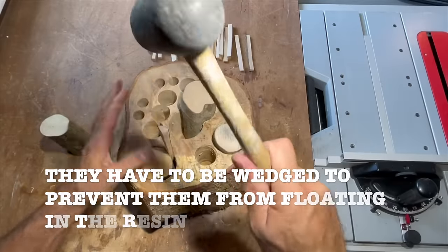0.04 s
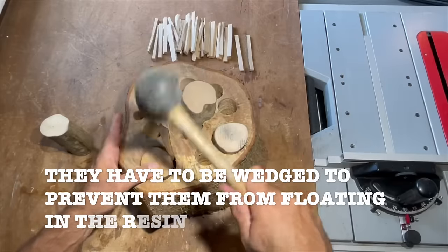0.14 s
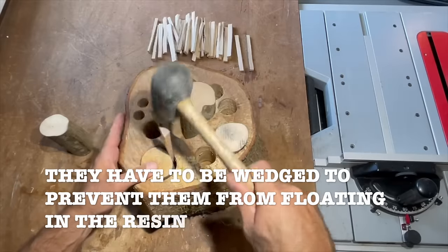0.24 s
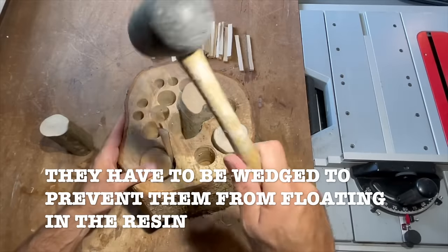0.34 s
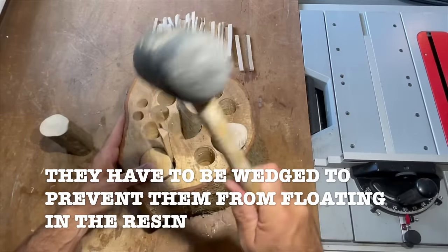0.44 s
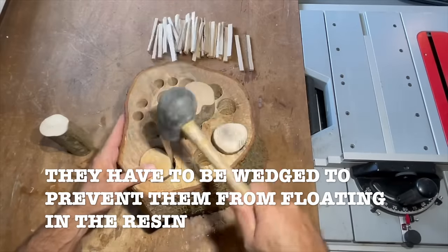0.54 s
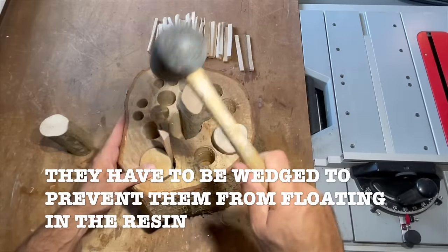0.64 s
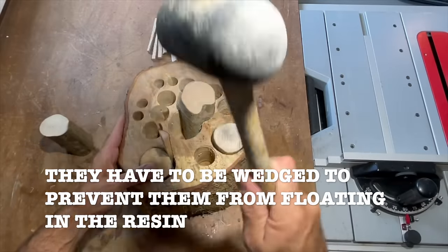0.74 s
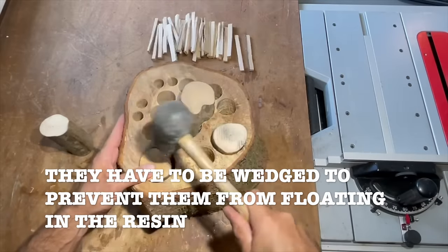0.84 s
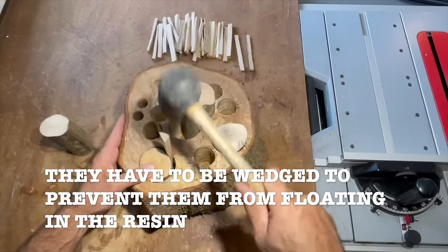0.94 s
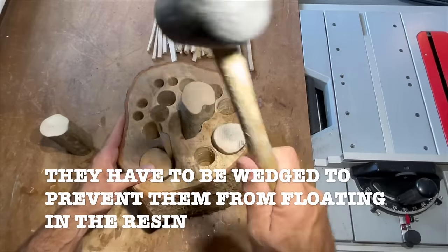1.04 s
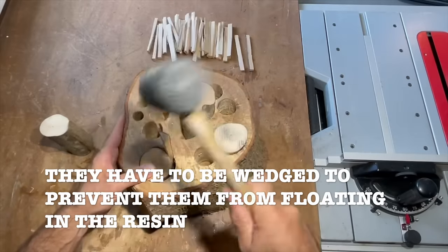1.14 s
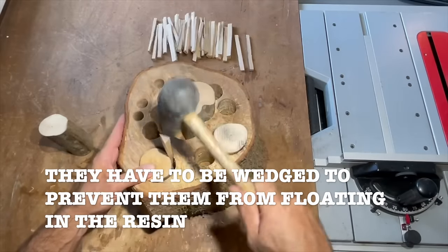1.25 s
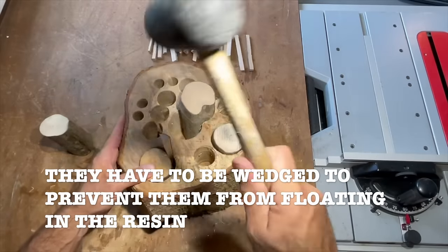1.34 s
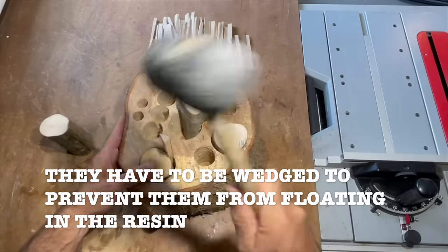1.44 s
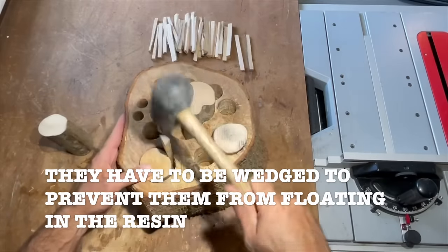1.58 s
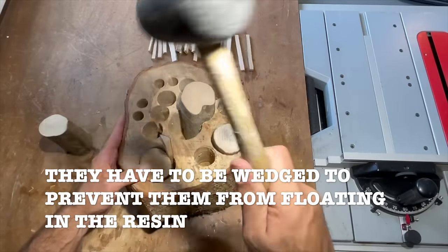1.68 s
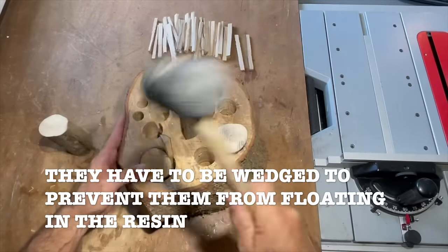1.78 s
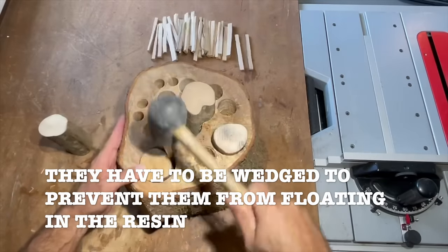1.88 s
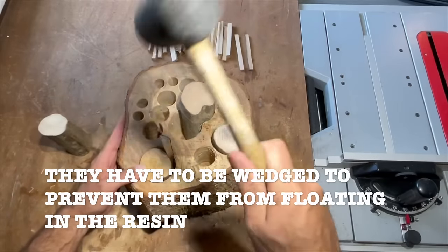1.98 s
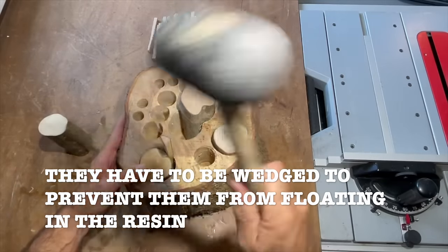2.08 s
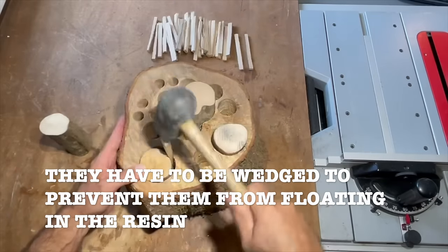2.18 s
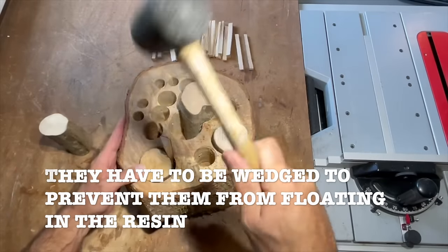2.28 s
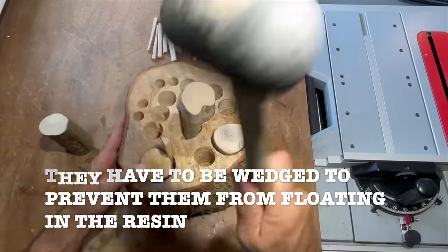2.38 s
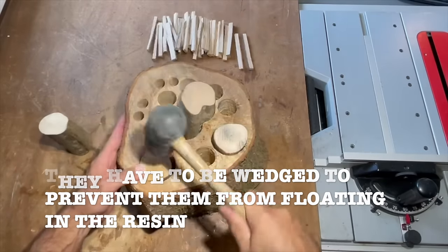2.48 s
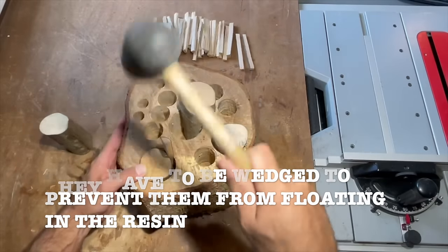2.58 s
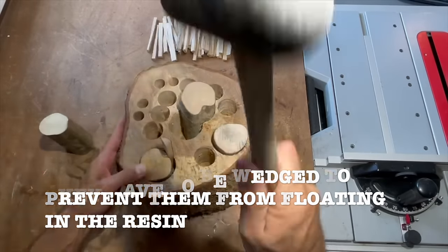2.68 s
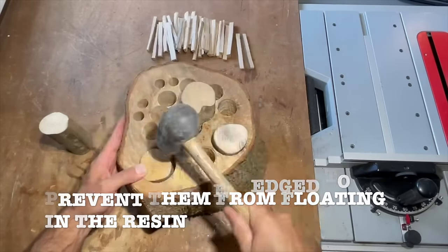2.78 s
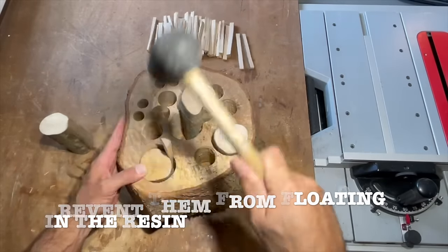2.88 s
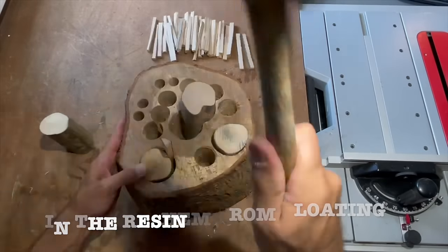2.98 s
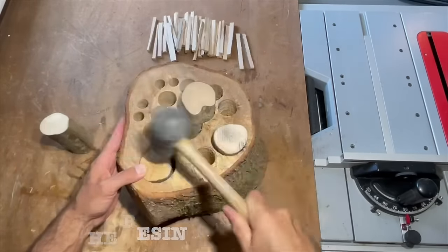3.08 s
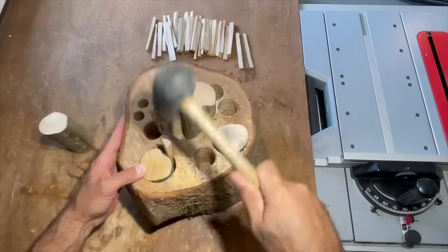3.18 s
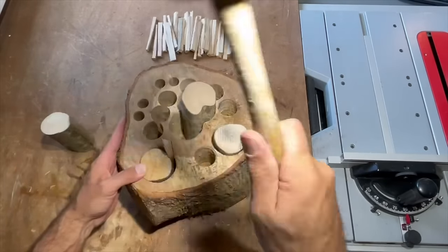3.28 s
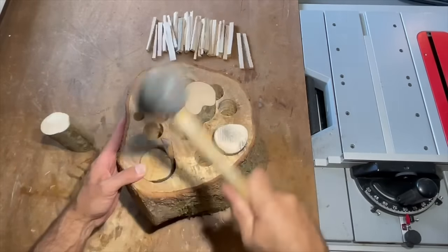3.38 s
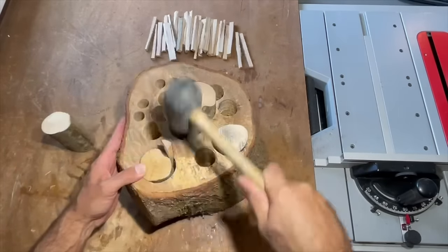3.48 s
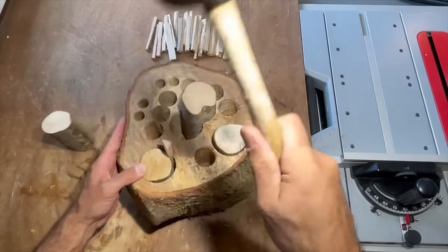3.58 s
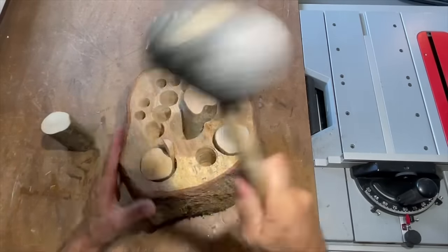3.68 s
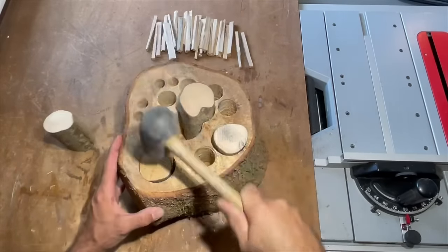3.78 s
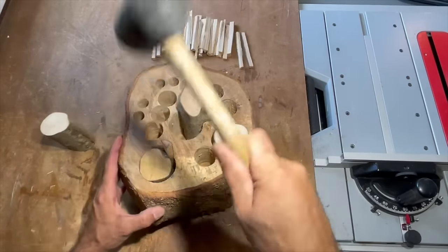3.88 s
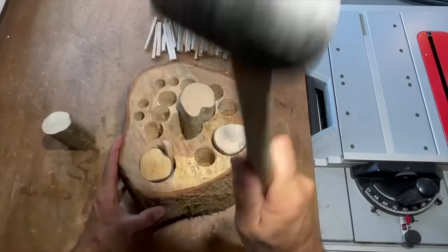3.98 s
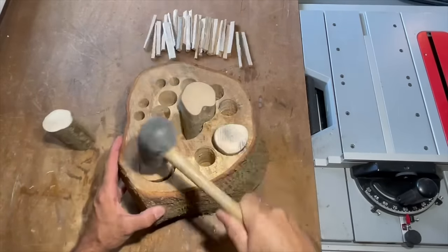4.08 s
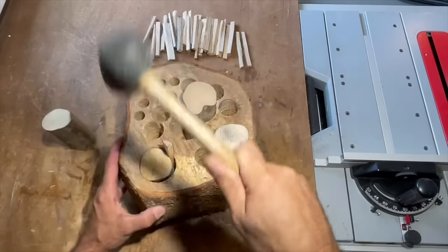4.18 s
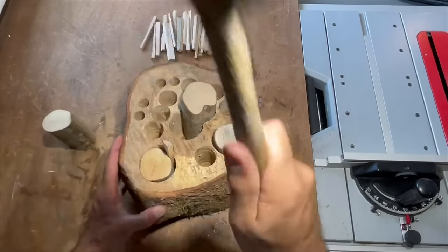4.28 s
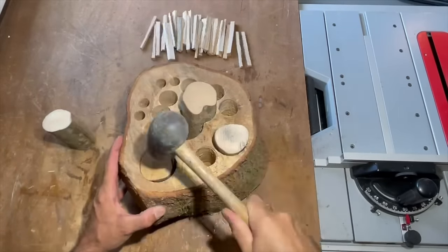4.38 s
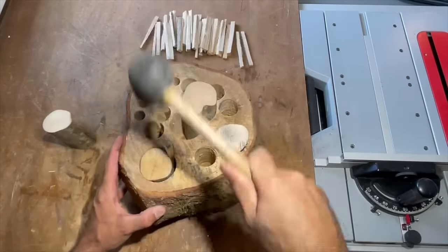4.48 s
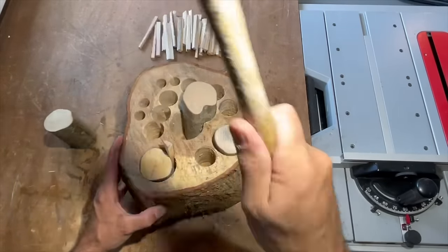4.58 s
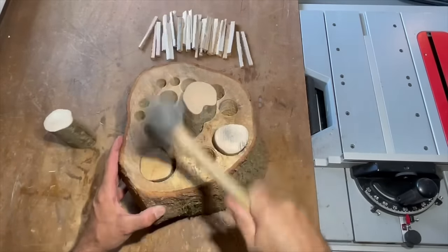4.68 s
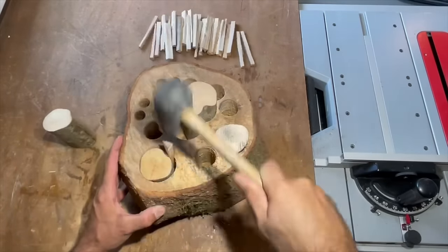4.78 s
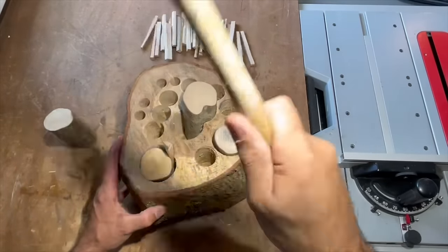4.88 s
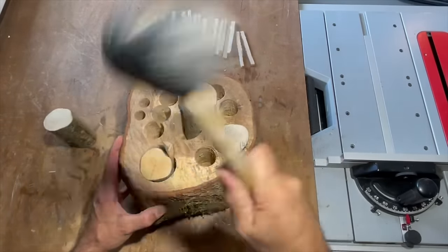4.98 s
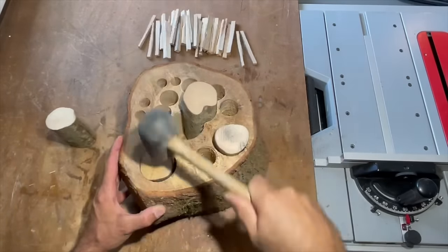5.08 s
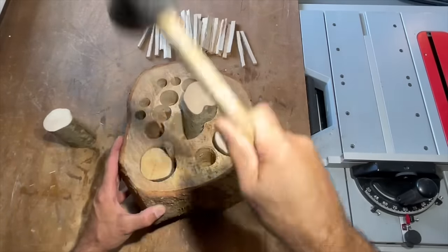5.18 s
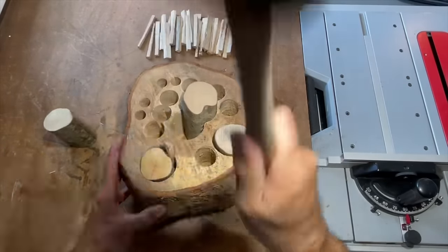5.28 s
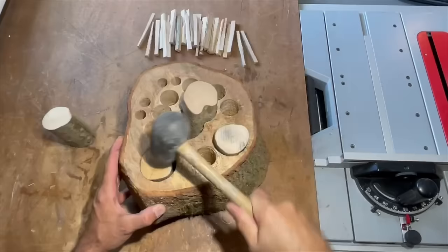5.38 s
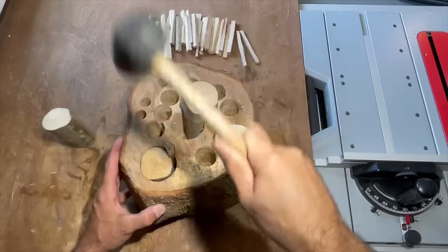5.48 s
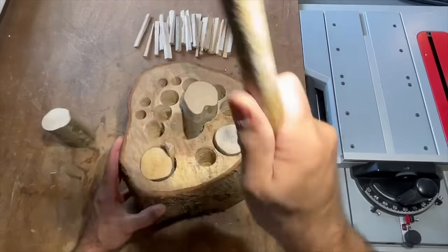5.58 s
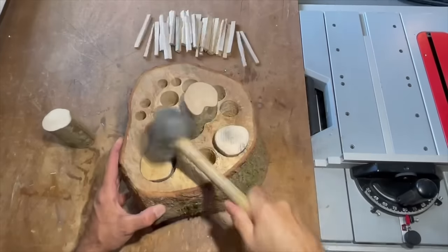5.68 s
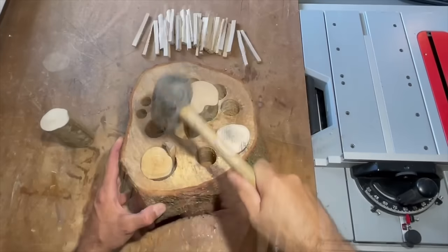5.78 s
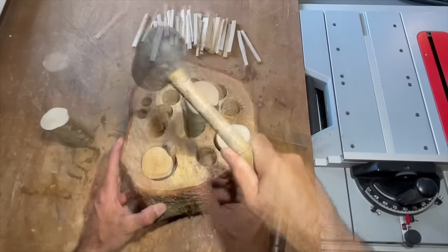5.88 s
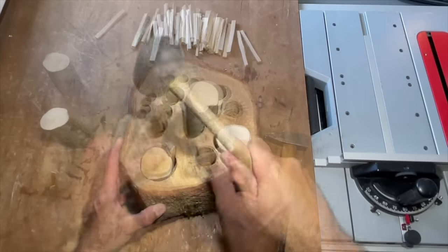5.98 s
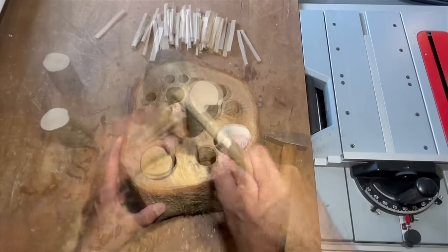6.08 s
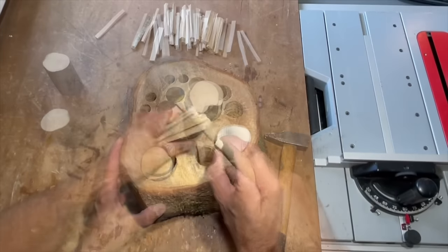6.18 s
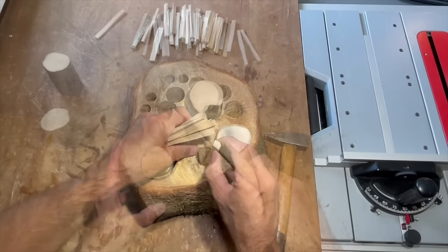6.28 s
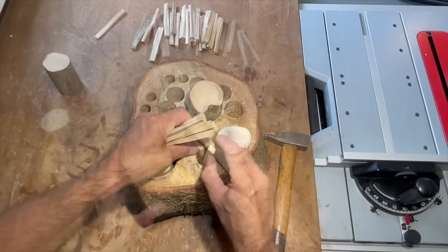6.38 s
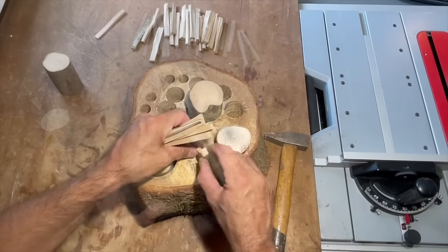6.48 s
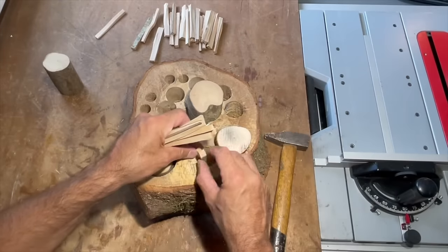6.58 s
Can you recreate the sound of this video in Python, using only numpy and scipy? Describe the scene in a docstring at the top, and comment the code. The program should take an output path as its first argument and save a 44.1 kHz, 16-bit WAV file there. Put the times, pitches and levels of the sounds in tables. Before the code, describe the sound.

Steady mallet knocks on a wooden wedge shift from loose, bright clacks to firm, ringing thuds, then stop, leaving quiet rustling of sticks.

```python
"""A rubber mallet drives a thin wooden wedge into a log slab on a workbench, eighteen even blows in a small workshop.
Wedge, slab, bench and room standing waves are sums of damped modes; noise bursts give the crack of slipping fibres.
As the loose wedge seats, its bright clack gives way to a firmer ring and the slab knocks harder.
A light wooden tick comes just before the last blow and a fainter one after it; then a whir and the handling of sticks.
A low rumble opens as the dying tail of an earlier blow; coloured noise makes the room tail; two ports feed a limiter."""
import sys
import numpy as np
from scipy import signal
from scipy.fft import rfft, irfft, next_fast_len
from scipy.io import wavfile
from scipy.ndimage import uniform_filter1d, minimum_filter1d

SR = 44100
rng = np.random.default_rng(int(sys.argv[2]) if len(sys.argv) > 2 else 0)


def digitize_waveform(pressure):
    """Quantize a signal to 16-bit integers and store it at the path in sys.argv[1].

    Rows of a 2-D input are taken as channels; values are limited to [-1, 1].
    """
    field = np.atleast_2d(pressure).T
    bounded = np.clip(field, -1, 1)
    quanta = np.round(bounded * 32767).astype(np.int16)
    wavfile.write(sys.argv[1], SR, quanta)


N = 293265
T = np.arange(int(SR * 0.8)) / SR  # time within one short sound, in seconds


def amp(db):
    """Level: decibels converted to a linear gain."""
    return 10 ** (np.asarray(db) / 20)


def unit(x):
    """Normalisation: a signal scaled to rms 1."""
    return x / np.sqrt(np.mean(x ** 2) + 1e-20)


def along(points, hz):
    """Logarithmic frequency scale: (Hz, value) points interpolated on a log axis."""
    f, v = np.transpose(points)
    return np.interp(np.log(hz + 1), np.log(f + 1), v)


def shared_difference(points, hz):
    """Stereo difference: left minus right, half given to the left and half taken from the right."""
    half = along(points, hz) / 2
    return np.stack([half, -half])


def filtered(x, response):
    """Linear filtering: the spectrum of x multiplied by a frequency response."""
    n = x.shape[-1]
    m = next_fast_len(n + SR // 4)
    spectrum = rfft(x, m) * response(np.fft.rfftfreq(m, 1 / SR))
    return irfft(spectrum, m)[..., :n]


def decay(age, t60):
    """Exponential damping: a fall of 60 dB in t60 seconds."""
    return np.exp(-np.log(1000) * age / t60)


def onset(s, middle, spread):
    """Logistic transition: a smooth step from 0 to 1 around the time middle."""
    return 0.5 + 0.5 * np.tanh((s - middle) / (2 * spread))


# Incoherence of the two ports. Each row: frequency in Hz, share of noise power not in common.
APART = [(100, 0.055), (400, 0.047), (1000, 0.91), (4000, 0.98), (8000, 0.17), (12000, 0.023)]


def noise(spectrum, size=len(T)):
    """Partial coherence: coloured noise of rms 1, partly common to the two ports and partly their own."""
    white = rng.standard_normal((3, size))
    apart = lambda hz: np.clip(along(APART, hz), 0, 1)
    common = filtered(white[0], lambda hz: amp(along(spectrum, hz)) * np.sqrt(1 - apart(hz)))
    own = filtered(white[1:], lambda hz: amp(along(spectrum, hz)) * np.sqrt(apart(hz)))
    return unit(common + own)


def add(track, s, sound):
    """Superposition: a sound mixed into the track at time s."""
    part = track[:, max(round(s * SR), 0):][:, :sound.shape[-1]]
    part += sound[..., :part.shape[1]]


def alternating(modes):
    """Modal phase: neighbouring modes swing in opposite directions."""
    return np.pi * np.arange(len(modes))[:, None]


def ring(modes, scatter_db, detune, phases=0, pitch=1):
    """Modal superposition: damped modes that swell and die, with random level and pitch at each call."""
    hz, db, t60, rise = np.transpose(modes)[:, :, None]
    louder, sharper = rng.standard_normal((2, len(modes), 1))
    envelope = amp(db + scatter_db * louder) * decay(T, t60) * (1 - np.exp(-T / rise))
    mode_hz = hz * pitch * (1 + detune * sharper)
    return np.sum(envelope * np.sin(2 * np.pi * mode_hz * T + phases), axis=-2)


def burst(hold, t60):
    """Contact friction: full level for hold seconds while the wood slips, then exponential damping."""
    return decay(np.maximum(T - hold, 0), t60)


# Colour of the low rumble. Each row: frequency in Hz, relative level in dB.
RUMBLE_COLOUR = [(25, -20.5), (60, 1.5), (95, 3), (200, -18), (400, -13.5), (700, -20.5), (1100, -29),
                 (3000, -32), (6000, -39.5), (12000, -46.5), (16000, -50)]
# Swells of the rumble: the dying tail of an earlier blow at the start, and a later swell near 6.5 s.
# Each row: centre in seconds, level in dB, half length (to 1/e) in seconds.
RUMBLE_SWELLS = [(0, -49, 0.064), (6.511, -55.5, 0.045)]
HOLD_DB, REST_DB = -56, -67  # rumble while the hands hold the slab, and once they let go
LET_GO_S, LET_GO_SPREAD_S = 5.7, 0.03


def low_rumble():
    """Low-frequency noise: an earlier blow's dying tail, hands holding the slab, and a swell near 6.5 s."""
    t = np.arange(N) / SR
    hold = amp(HOLD_DB + (REST_DB - HOLD_DB) * onset(t, LET_GO_S, LET_GO_SPREAD_S))
    swells = sum(amp(db) * np.exp(-((t - s) / half) ** 2) for s, db, half in RUMBLE_SWELLS)
    return (hold + swells) * noise(RUMBLE_COLOUR, size=N)


# Extra glare of a loose wedge, scaled by 1.5 minus the seating. Each row: frequency in Hz, gain in dB.
LOOSE_GLARE = [(130, 0.5), (250, -2), (420, 1.5), (1000, -1), (1800, 3.5), (3200, 1.5), (5000, -1),
               (8000, 0.5), (12000, 3.5)]
# the free end of the wedge rings higher as it gets shorter
LONG_END_HZ, SHORT_END_HZ = 1740, 2930
SHORTEN_S, SHORTEN_SPREAD_S = 2.2, 0.25  # middle and spread of that rise
LONG_END_DB, END_DB_PER_S = 4.5, 1.5  # it rings freely while loose, and ever harder as it is driven tight


def wedge_colour(s, seat, octaves):
    """Broad resonance: gain over frequency from the shortening free end, with the glare of a loose fit."""
    short = onset(s, SHORTEN_S, SHORTEN_SPREAD_S)
    centre = LONG_END_HZ + (SHORT_END_HZ - LONG_END_HZ) * short
    end_db = LONG_END_DB * (1 - seat) + END_DB_PER_S * max(s - SHORTEN_S, 0)
    bump = lambda hz: np.exp(-(np.log2((hz + 1) / centre) / octaves) ** 2)
    return lambda hz: amp(end_db * bump(hz) + (1.5 - seat) * along(LOOSE_GLARE, hz))


# Short slips of the wedge; the first three carry the crack.
# Each row: delay after contact in seconds, relative level in dB.
SLIPS = [(0, -2.5), (.0027, 5.5), (.0052, -6), (.0083, -25), (0.0106, -28)]


def slipping(t60, rise, jitter, scatter_db):
    """Stick-slip motion: the envelope of the wedge's slips, each a quick burst of uneven time and size."""
    delay, db = np.transpose(SLIPS)[:, :, None]
    later, louder = rng.standard_normal((2, len(SLIPS), 1))
    age = np.maximum(T - delay * (1 + jitter * later), 0)
    bursts = amp(db + scatter_db * louder) * decay(age, t60) * (1 - np.exp(-age / rise))
    return np.sqrt(np.sum(bursts ** 2, axis=0))  # powers add


# Modes of the wedge while loose, and when seated.
# Each row: frequency in Hz, relative level in dB, t60 in seconds, rise time constant in seconds.
LOOSE = [(1333, -2.5, 0.019, 0.00055), (1725, -16, 0.12, 0.0023), (1766, -9, 0.05, 0.00092),
         (2190, -4, 0.028, 0.00058), (2463, -14.5, 0.056, 0.00063), (3100, -11.5, 0.014, 0.001),
         (3670, -18.5, 0.035, 0.00035)]
SEATED = [(1231, -17.5, 0.055, 0.00081), (1505, -16.5, 0.04, 0.00084), (1440, -17.5, 0.02, 0.00089),
          (1783, -11.5, 0.077, 0.00036), (2197, -8.5, 0.044, 0.0016), (2554, -17.5, 0.13, 0.00054),
          (2920, 4, 0.012, 0.004), (3263, -21.5, 0.045, 0.0013), (4316, -23, 0.065, .001),
          (4720, -15.5, 0.053, 0.0004), (6380, -13, 0.032, .001)]
# Colour of the cracking fibres. Each row: frequency in Hz, relative level in dB.
CRACK = [(200, -14), (700, 10), (1500, -9), (3200, -0.5), (4200, -7.5), (6500, -9.5), (8500, -15),
         (12000, -15.5), (15500, -20.5)]


def wedge(clack_db, crack_db, seat, loose_phase, seated_phase, grain):
    """Boundary conditions: the wedge's modes change from loose to seated, while slipping fibres crack."""
    loose = ring(LOOSE, scatter_db=0.5, detune=0.023, phases=loose_phase)
    seated = ring(SEATED, scatter_db=2.5, detune=0.012, phases=seated_phase)
    clack = amp(clack_db - 6) * ((1 - seat) * loose + np.sqrt(seat) * seated)
    # the same fibres crack at each blow, never quite alike
    fibres = 0.7 * grain + 0.73 * noise(CRACK)
    crack = fibres * slipping(t60=0.014, rise=0.00055, jitter=0.074, scatter_db=1.5)
    return clack + amp(crack_db - 9.5) * crack


# Colour of the room tail. Each row: frequency in Hz, relative level in dB.
ROOM_COLOUR = [(30, -19), (60, 4), (135, 5), (190, -8), (260, 7), (420, -4.5), (700, -4), (1000, -8),
               (1600, -8.5), (2400, -14.5), (3100, -15.5), (4200, -19.5), (6600, -23.5), (7600, -29.5),
               (9500, -27), (11500, -30), (15500, -37)]
# Reverberation time of the workshop. Each row: frequency in Hz, t60 in seconds.
ROOM_T60 = [(100, 0.74), (300, 0.49), (1000, 0.63), (2500, 0.62), (6000, 0.62), (12000, 0.38)]


def room_tail(build, early_life=0.025):
    """Reverberation: strong early echoes off the bench, then each band dies at its own speed."""
    hz, t, z = signal.stft(noise(ROOM_COLOUR), SR, nperseg=256)
    dying = z * decay(t, along(ROOM_T60, hz)[:, None])
    tail = signal.istft(dying, SR, nperseg=256)[1]
    early = 1 + np.exp(-T / early_life)
    return tail[:, :len(T)] * (1 - np.exp(-T / build)) * early


# Modes of the bench top.
# Each row: frequency in Hz, relative level in dB, t60 in seconds, rise time constant in seconds.
BENCH = [(70.34, -2, 0.19, 0.055), (94, -9, 0.18, 0.018), (143.3, -11, 0.13, 0.036)]


def bench():
    """Plate vibration: the bench top booms in a few low damped modes."""
    return ring(BENCH, scatter_db=1.0, detune=0.0036, phases=alternating(BENCH))


# Standing waves between the walls.
# Each row: frequency in Hz, relative level in dB, t60 in seconds, rise time constant in seconds.
STANDING = [(44.7, -25.5, 0.47, 0.025), (74.9, -5.5, 0.33, 0.035), (123.3, -16.5, 0.27, 0.031),
            (161.15, -27, 0.51, 0.0017)]


def standing_waves():
    """Room modes: low standing waves between the walls swell and die after a blow."""
    return ring(STANDING, scatter_db=0.5, detune=0.0035, phases=alternating(STANDING))


# Modes of the slab.
# Each row: frequency in Hz, relative level in dB, t60 in seconds, rise time constant in seconds.
SLAB = [(256, -12, .12, .004), (294, -5, .055, .002), (395, -10, .07, .002), (535, -16, .06, .001),
        (690, -11, .05, .0005), (815, -14, .05, .0006), (1024, -13.5, .042, .0005)]
# The slab's upper modes face the left port. Each row: frequency in Hz, left minus right in dB.
SLAB_PAN = [(400, -0.5), (560, 14.5), (820, 6.5), (1050, 7)]


def slab(seat, tint):
    """Joint stiffness: the slab knocks in damped modes, pitched higher as the wedge firms the joint."""
    knock = ring(SLAB, scatter_db=1.5, detune=0.006, pitch=1 - 0.05 * (1 - seat))
    return filtered(knock, lambda hz: amp(shared_difference(SLAB_PAN, hz)) * tint(hz))


# relative levels of bench, slab, wedge and fibres under a full blow on a firm wedge
THUMP_DB, KNOCK_DB, CLACK_DB, CRACK_DB = -4.5, 1.13, -1.6, -2.5
LOOSE_THUMP_DB = 2  # a loose wedge passes on more of the slow push
# the first blows are cushioned as the wedge sinks; this fades with the time constant CUSHION_S
CUSHION_KNOCK_DB, CUSHION_CLACK_DB, CUSHION_S = -16.5, -7, 1


def blow_levels(s, strength_db, seat):
    """Energy transfer: thump, knock, clack and crack follow the strength; cushioning fades as sinking stops."""
    cushion = np.exp(-(s - BLOWS[0][0]) / CUSHION_S)
    thump_db = THUMP_DB + LOOSE_THUMP_DB * (1 - seat)
    knock_db = KNOCK_DB + CUSHION_KNOCK_DB * cushion
    clack_db = CLACK_DB + CUSHION_CLACK_DB * cushion
    return strength_db + np.array([thump_db, knock_db, clack_db, CRACK_DB])


# Mallet blows. Each row: start in seconds, strength in dB.
BLOWS = [(.190, -4), (.532, -1), (0.863, 0.5), (1.2007, 0.5), (1.518, 0), (1.8374, 0), (2.1557, -0.45),
         (2.469, 0.9), (2.7802, -0.74), (3.1054, 0), (3.427, 0), (3.7539, -1.15), (4.0739, -2.5),
         (4.3937, -2.1), (4.7192, -1.8), (5.047, -2.5), (5.3777, -3), (5.71, -3)]
SEAT_S, SEAT_SPREAD_S = 1.6, 0.51  # when the wedge is half seated, and how gradually it grips


def mallet():
    """Impact transmission: each blow drives the wedge, then reaches bench and slab, later if it is loose."""
    out = np.zeros((2, N))
    walls, grain = room_tail(build=0.002), noise(CRACK)
    loose_phase = rng.uniform(0, 2 * np.pi, (2, len(LOOSE), 1))
    seated_phase = rng.uniform(0, 2 * np.pi, (2, len(SEATED), 1))
    for s, strength_db in BLOWS:
        seat = onset(s, SEAT_S, SEAT_SPREAD_S)
        thump_db, knock_db, clack_db, crack_db = blow_levels(s, strength_db, seat)
        give = 0.003 * (1 - seat)  # delay in a loose joint, in seconds
        tint = wedge_colour(s, seat, octaves=0.31)
        struck = wedge(clack_db, crack_db, seat, loose_phase, seated_phase, grain)
        add(out, s, filtered(struck, tint))
        # the walls answer alike each time, apart from what the moving arms change
        tail = 0.95 * walls + 0.54 * room_tail(build=0.0051)
        strength = [(100, thump_db + 3.5), (300, 0.52 * knock_db), (900, 0.5 * knock_db),
                    (1800, clack_db), (6000, crack_db)]  # (Hz, relative dB)
        reverberation = filtered(tail, lambda hz: amp(along(strength, hz)) * tint(hz))
        add(out, s + 0.0016, amp(-20) * reverberation)
        add(out, s + 0.0026 + give, amp(thump_db + 5.5) * (bench() - standing_waves()))
        add(out, s + 0.003297 + give, amp(knock_db) * slab(seat, tint))
    return out


# Light wooden ticks. Each row: start in seconds, relative snap level in dB, relative ring level in dB.
TICKS = [(5.622, -31.5, -10.5), (5.977, -38, -58.5), (5.983, -41, -62)]
# Colour of the snap. Each row: frequency in Hz, relative level in dB.
SNAP = [(500, -29.5), (2000, 5), (5000, 13), (8500, 3), (11000, 6.5), (15500, 4)]
# Modes of the small sticks.
# Each row: frequency in Hz, relative level in dB, t60 in seconds, rise time constant in seconds.
TICK_MODES = [(863, 1.5, 0.0034, 0.00062), (1120, -1.5, 0.01, 0.00056), (1400, -8.5, 0.013, 0.00027),
              (1650, -2, .016, 0.0021), (2307, -12, 0.0042, 0.00058)]


def ticks():
    """Light impact: small sticks snap against wood and ring briefly, too lightly to shake the bench."""
    out = np.zeros((2, N))
    for s, snap_db, ring_db in TICKS:
        envelope = burst(hold=0.00067, t60=0.025) + amp(-18.5) * burst(hold=0, t60=0.47)
        add(out, s, amp(snap_db) * noise(SNAP) * envelope)
        wood = ring(TICK_MODES, scatter_db=1, detune=0.01, phases=alternating(TICK_MODES))
        add(out, s + 0.0026, amp(ring_db + 0.5) * wood)
    return out


# Colour of the whir. Each row: frequency in Hz, relative level in dB.
WHIR = [(200, -18), (480, -18), (640, -11.5), (760, 3.5), (920, -23), (1500, -28.5), (3400, -37),
        (3800, -10), (4150, -35), (9000, -48)]
WHIR_MIDDLE_S, WHIR_SPREAD_S, WHIR_DB = 6.34, 0.02, -67  # middle and spread of the fade-in, rms level


def whir():
    """Stationary noise: a faint steady whir in narrow bands fades in after the last blow."""
    t = np.arange(N) / SR
    return amp(WHIR_DB) * onset(t, WHIR_MIDDLE_S, WHIR_SPREAD_S) * noise(WHIR, size=N)


# Sticks touching in the hand. Each row: start in seconds, nominal peak level in dB.
TOUCHES = [(6.421, -59), (6.4452, -49.5), (6.5275, -50.5), (6.5674, -52.5), (6.5814, -50), (6.6114, -50)]
TOUCH_CREST_DB = 9  # nominal peak of a touch over its rms
# Colour of sticks and fingers rubbing. Each row: frequency in Hz, relative level in dB.
RUSTLE = [(1000, -13), (4000, -6.5), (7000, -4), (8500, 0), (11000, 2.5), (15500, -4)]
RUSTLE_MIDDLE_S, RUSTLE_SPREAD_S, RUSTLE_DB = 6.45, 0.008, -72  # middle and spread of the fade-in, rms level


def stick_handling():
    """Friction noise: sticks touch in short damped bursts over a faint steady rustle."""
    t = np.arange(N) / SR
    out = amp(RUSTLE_DB) * onset(t, RUSTLE_MIDDLE_S, RUSTLE_SPREAD_S) * noise(RUSTLE, size=N)
    for s, db in TOUCHES:
        add(out, s, amp(db - TOUCH_CREST_DB) * noise(RUSTLE) * burst(hold=0.0017, t60=0.05))
    return out


# Level difference of the ports. Each row: frequency in Hz, left minus right in dB.
PORT_DB = [(60, 0.5), (130, 6), (280, 1.6), (420, 2), (700, 3), (1300, 2), (2300, 1.5), (4500, 5.5),
           (6500, 7.5), (9000, 0.5), (15000, 0)]
# Phase difference of the ports. Each row: frequency in Hz, lead of the left in radians.
PORT_PHASE = [(60, -0.5), (400, 0.54), (700, 2), (1100, 1.82), (5000, 1.46), (7500, -2), (9200, 3.5),
              (11000, 1.07), (12300, 0.5)]


def scene():
    """Interchannel differences: all sources reach the two ports with a difference of level and phase."""
    def ports(hz):
        return amp(shared_difference(PORT_DB, hz)) * np.exp(1j * shared_difference(PORT_PHASE, hz))
    sources = low_rumble() + mallet() + ticks() + whir() + stick_handling()
    return filtered(sources, ports)


CEILING = 0.92  # peak amplitude leaving the limiter, full scale = 1
TOP_HZ = 15900  # upper band limit


def record(dry):
    """Peak limiting: a fast look-ahead gain holds peaks at the ceiling; a steep low-pass then limits the band."""
    needed = np.minimum(1, CEILING / (np.abs(dry).max(axis=0) + 1e-9))
    gain = uniform_filter1d(minimum_filter1d(needed, size=65), size=65)  # window in samples
    return filtered(dry * gain, lambda hz: 1 / (1 + (hz / TOP_HZ) ** 120))


dry = scene()
out = record(dry)
digitize_waveform(out)
```